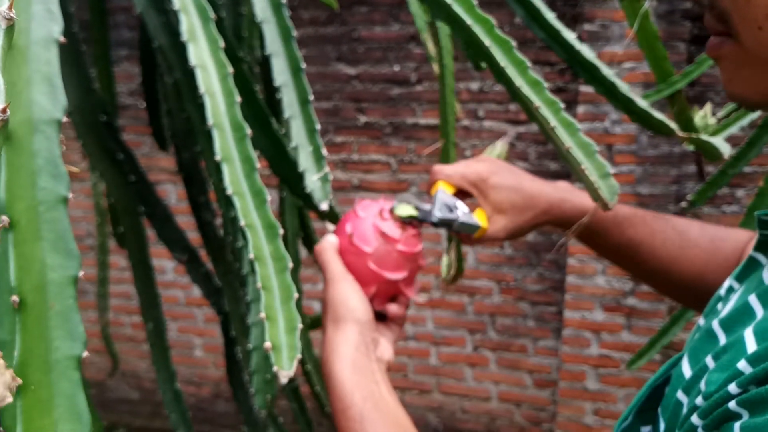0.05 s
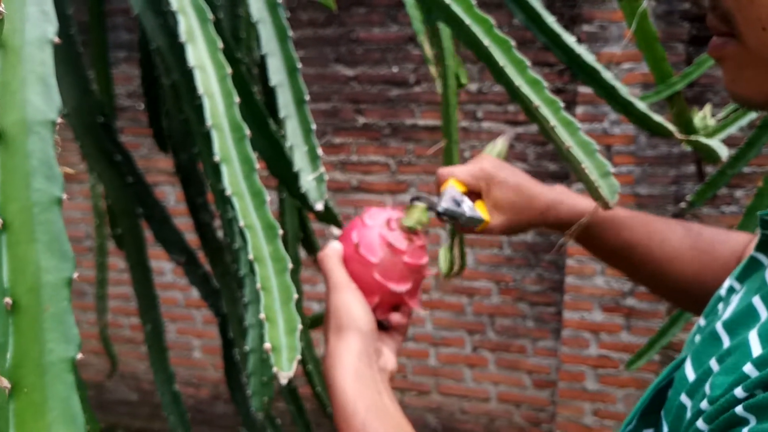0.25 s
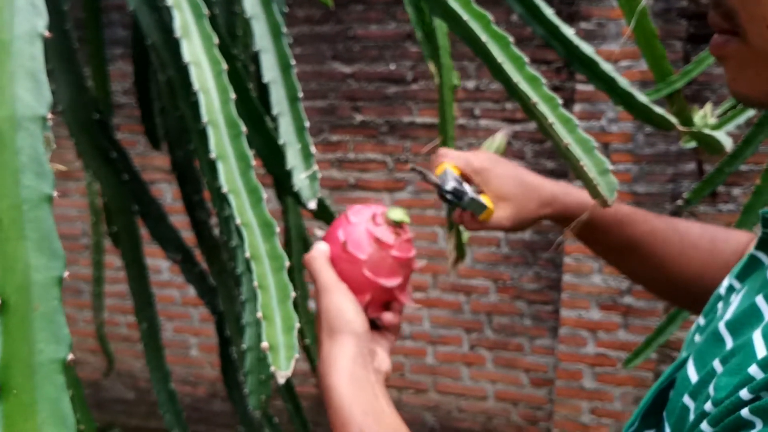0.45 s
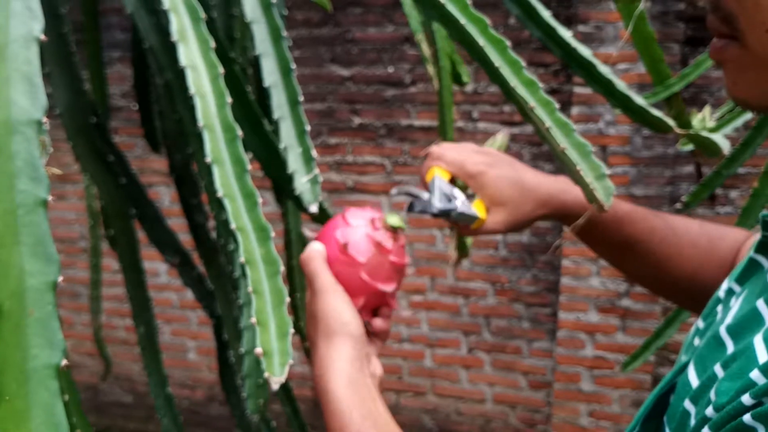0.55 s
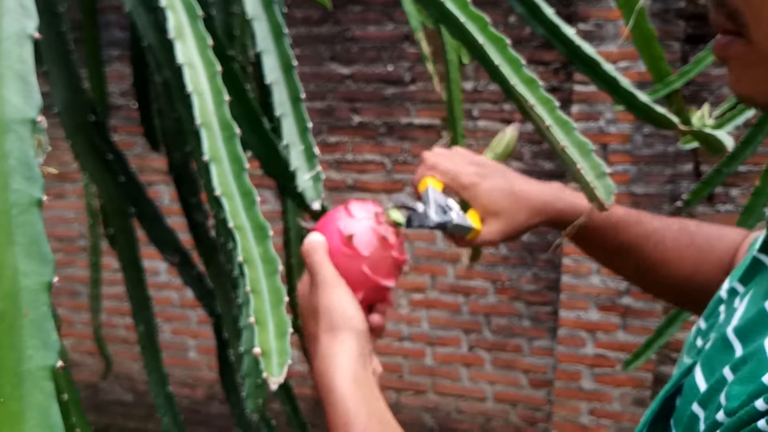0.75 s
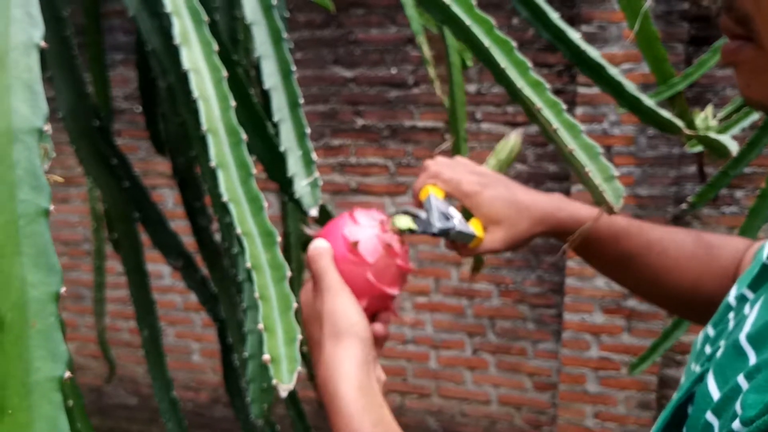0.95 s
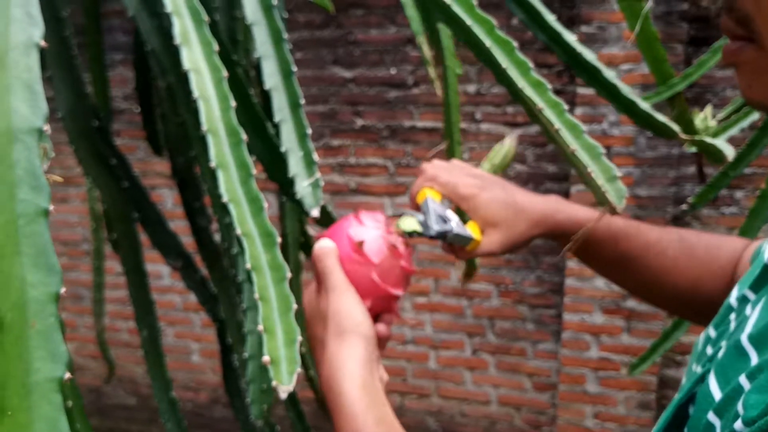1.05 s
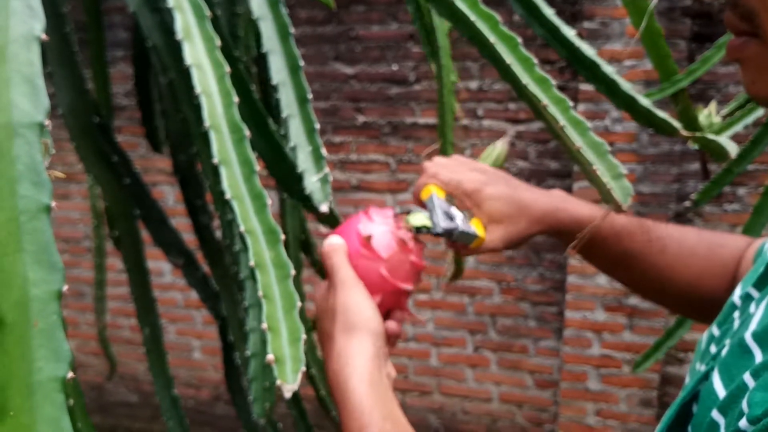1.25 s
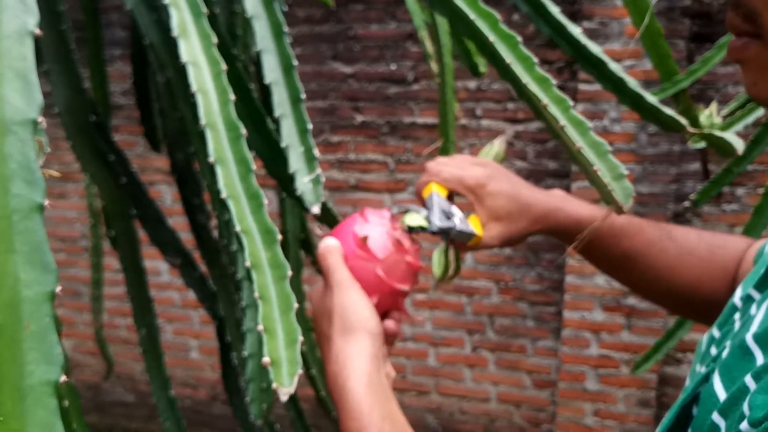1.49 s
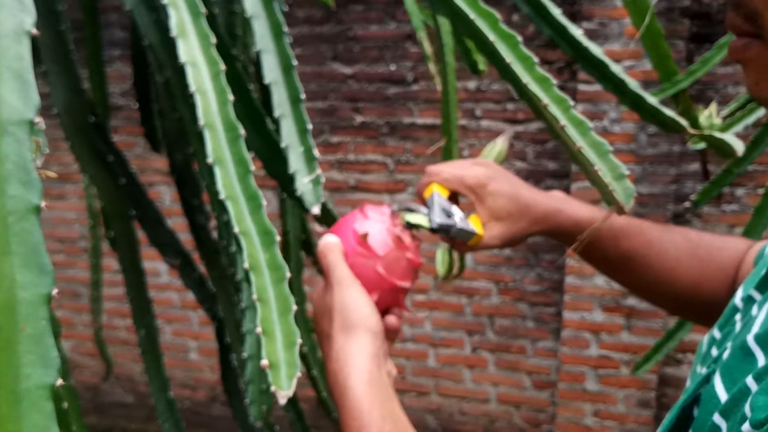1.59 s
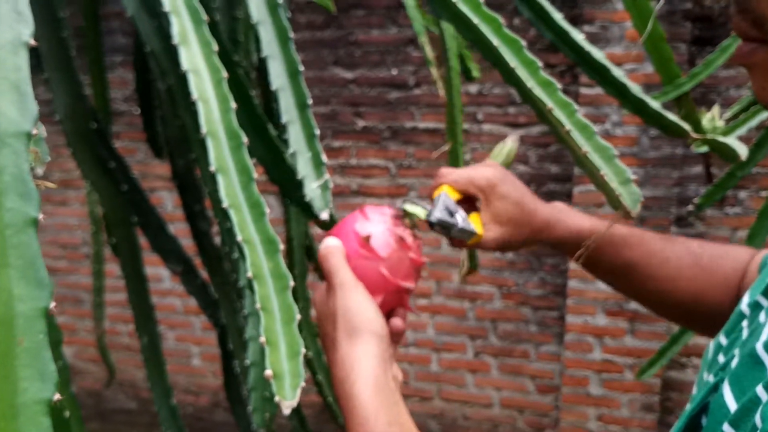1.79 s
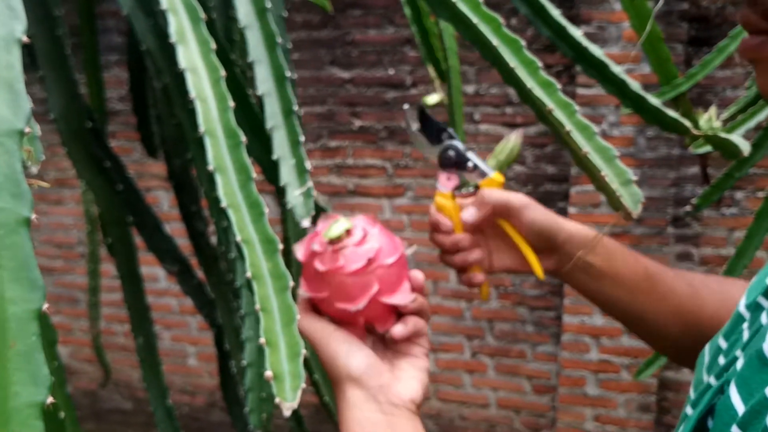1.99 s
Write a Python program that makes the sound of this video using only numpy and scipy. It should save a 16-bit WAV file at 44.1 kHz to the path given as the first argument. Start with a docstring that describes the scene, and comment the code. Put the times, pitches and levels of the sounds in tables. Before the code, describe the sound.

A single snip of hand shears right at the start, gritty crunch then sharp steel clack and brief squeak on opening, with short wall reflections; then quiet garden air, steady insect chorus, sparse far birds and a small late click.

```python
"""Pruning shears crunch through a fleshy stem and clack shut close by in a walled garden; the spring squeaks
as they open. A far insect chorus sings high, a few small birds whistle thinly, distant traffic rumbles.
Blows and noisy scrapes ring the modes of the shears; the spring is made of rising pings, the birds of gliding
narrow noise, insects and air of shaped stereo noise, with thin ticks and soft low bumps among them.
The walls answer shears, spring and ticks with a short decaying noise tail."""
import sys
import numpy as np
from scipy import signal
from scipy.fft import rfft, irfft, next_fast_len
from scipy.io import wavfile
from scipy.ndimage import uniform_filter1d, map_coordinates

SR = 44100
rng = np.random.default_rng(int(sys.argv[2]) if len(sys.argv) > 2 else 0)


def linear_from_db(decibels):
    """Turn decibels (scalar or array-like) into linear amplitude factors; 0 gives 1."""
    return 10 ** (np.asarray(decibels, float) / 20)


def bounce(signal):
    """Save signal as a 16-bit WAV file at the path given by the first command-line argument."""
    frames = np.transpose(np.atleast_2d(signal))
    limited = np.clip(frames, -1, 1)
    pcm = np.round(limited * 32767).astype(np.int16)
    wavfile.write(sys.argv[1], SR, pcm)


N = 88200


def unit(x):
    """Brought to rms 1."""
    return x / np.sqrt(np.mean(x ** 2) + 1e-20)


def along(points, hz):
    """Values between (Hz, value) points on a log frequency axis."""
    f, v = np.transpose(points)
    return np.interp(np.log(hz + 1), np.log(f + 1), v)


def level(rows):
    """Gain per sample from (seconds, dB) rows."""
    s, db = np.transpose(rows)
    return linear_from_db(np.interp(np.arange(N) / SR, s, db))


def wobble(rate):
    """A smooth random curve through rate knots a second."""
    knots = rng.standard_normal(int(N * rate / SR) + 4)
    return map_coordinates(knots, [np.arange(N) * rate / SR])


def sides(db):
    """Left and right gain for a left-right difference in dB."""
    return linear_from_db(np.array([[db / 2], [-db / 2]]))


def filtered(x, response):
    """x filtered by a complex response of frequency."""
    m = next_fast_len(x.shape[-1] + 8192)
    spectrum = rfft(x, m) * response(np.fft.rfftfreq(m, 1 / SR))
    return irfft(spectrum, m)[..., :x.shape[-1]]


def rush(gain, alike, patchy_db):
    """Stereo noise of rms 1, with smooth random patches of gain over time and frequency."""
    z = signal.stft(rng.standard_normal((2, N)), nperseg=512)[2]
    field = uniform_filter1d(rng.standard_normal(z.shape[1:]), size=5, axis=0)
    field = uniform_filter1d(field, size=9, axis=1)
    pair = signal.istft(z * linear_from_db(patchy_db * unit(field)), nperseg=512)[1][:, :N]

    def mid_side_gain(hz):
        # the balance of mid to side sets the left-right correlation
        turn = np.arccos(np.clip(along(alike, hz), -1, 1)) / 2
        return gain(hz) * np.array([np.cos(turn), np.sin(turn)])

    mid, side = filtered(pair, mid_side_gain)
    return unit(np.array([mid + side, mid - side]))


def add(track, s, sound):
    """Mix a stereo sound in at a time in seconds."""
    part = track[:, round(s * SR):][:, :sound.shape[1]]
    part += sound[:, :part.shape[1]]


def wall(sound):
    """The sound plus a fresh answer of the garden walls: noise that dies at a rate set by frequency."""
    # Each row: frequency in Hz, time to fall 60 dB in seconds.
    wall_decay = [(600, 0.4), (1500, 0.46), (3000, 0.31), (7000, 0.23), (12000, 0.15), (16000, 0.23)]
    wet_db, onset_s = -14.5, 0.00067
    hz, t, z = signal.stft(rng.standard_normal((2, SR // 3)), SR, nperseg=256)
    decay = linear_from_db(-60 * t / along(wall_decay, hz)[:, None])
    tail = signal.istft(z * decay, SR, nperseg=256)[1]
    tail = tail * (1 - np.exp(-np.arange(tail.shape[1]) / SR / onset_s))
    wet = linear_from_db(wet_db) * signal.fftconvolve(sound, tail / np.linalg.norm(tail[0]), axes=1)
    return wet + np.pad(sound, ((0, 0), (0, wet.shape[1] - sound.shape[1])))


def air():
    """Distant traffic rumble and the hiss of the open garden, as one bed of shaped noise."""
    # Tone of the bed. Each row: frequency in Hz, relative density in dB per Hz.
    air_tone = [(20, -20), (45, -12.5), (80, -0.5), (120, 2), (200, -3.5), (400, -7), (1000, -14.5),
                (2500, -19), (4500, -19.5), (7800, -24), (8600, -30), (13600, -36), (14800, -24.5),
                (15700, -22.5), (17000, -22)]
    # Stereo width of the bed. Each row: frequency in Hz, left-right correlation (0 to 1).
    likeness = [(50, 0.82), (150, 0.23), (400, 0.013), (10000, 0)]
    rms_db = -64
    return linear_from_db(rms_db) * rush(lambda hz: linear_from_db(along(air_tone, hz)), likeness, patchy_db=2.0)


def bumps():
    """Short swells of low pitch within the rumble: sines under a bell-shaped envelope."""
    # Soft low bumps. Each row: centre in seconds, level in dB, pitch in Hz, length in seconds.
    bump_rows = [(0.492, -53.5, 134, 0.026), (1.17, -61, 111.4, 0.069), (1.391, -62, 109, 0.011),
                 (1.568, -59.5, 109, 0.032)]
    out, t = np.zeros((2, N)), np.arange(N) / SR
    for s, db, hz, length in bump_rows:
        swell = np.exp(-(2 * (t - s) / length) ** 2)
        phase = rng.uniform(0, 0.73, (2, 1))  # radians, one per side
        out += linear_from_db(db) * swell * np.cos(2 * np.pi * hz * (t - s) + phase)
    return out


def insects():
    """Many far singers blur to a narrow, randomly fluttering band; a fainter, higher chorus swells behind."""
    # Main chorus over time. Each row: time in seconds, level in dB.
    chorus_level = [(0.45, -59.5), (0.69, -61), (1.338, -61.5), (1.49, -61), (2.0, -61)]
    # Fainter chorus over time. Each row: time in seconds, level in dB.
    far_level = [(0.45, -70.5), (0.614, -71), (0.86, -72.5), (1.248, -69.5), (1.504, -69), (1.766, -79),
                 (1.9, -89)]
    # Tone of the fainter chorus. Each row: frequency in Hz, relative density in dB per Hz.
    far_tone = [(5700, -41), (6100, 3.5), (6800, -0.5), (7900, -6.5), (8400, -41)]
    centre_hz, width_hz, flutter_db = 5451, 420, 1

    def chorus_band(hz):
        return 1 / (1 + (2 * (hz - centre_hz) / width_hz) ** 2) ** 1.34

    flutter = linear_from_db(flutter_db * wobble(62))
    near = level(chorus_level) * flutter * rush(chorus_band, [(5000, 0.043)], patchy_db=1.0)
    far = rush(lambda hz: linear_from_db(along(far_tone, hz)), [(5000, 0.1)], patchy_db=2.0)
    return near + level(far_level) * far


def birds():
    """Far whistles, smeared by distance into narrow gliding noise."""
    # Bird whistles. Each row: start in seconds, length in seconds, level in dB before breaks and fade,
    # first pitch in Hz, last pitch in Hz, smear in Hz, left-right difference in dB.
    whistle_rows = [(0.97, 0.16, -66, 6370, 6900, 247, -3), (1.298, 0.132, -63, 7010, 6880, 200, -5.5),
                    (1.683, 0.16, -59.5, 6210, 6470, 98, 0), (1.821, 0.15, -64, 6300, 6300, 130, -3),
                    (1.919, 0.108, -62, 7850, 7450, 250, 5), (1.954, 0.095, -54.5, 7230, 6930, 296, 3)]
    edge_s, breaks_db, fade_db_per_s = 0.035, 1.5, 20
    out, t = np.zeros((2, N)), np.arange(N) / SR
    for s, length, db, first_hz, last_hz, smear_hz, pan_db in whistle_rows:
        hz = np.interp(t, [s, s + length], [first_hz, last_hz])
        phase = 2 * np.pi * np.cumsum(hz) / SR
        # slow noise on a cosine and a sine carrier spreads the tone into a narrow band
        a, b = filtered(rng.standard_normal((2, 2, N)), lambda f: np.exp(-(f / smear_hz) ** 2))
        whistle = unit(a * np.cos(phase) + b * np.sin(phase))
        shape = np.clip(np.minimum(t - s, s + length - t) / edge_s, 0, 1)
        fade_db = fade_db_per_s * np.clip(t - s, 0, length)
        loudness = linear_from_db(db + breaks_db * wobble(24.46) - fade_db)
        out += loudness * sides(pan_db) * shape * whistle
    return out


def ticks():
    """Thin high ticks, likely an insect nearby: very short bursts of band-limited noise."""
    # High ticks. Each row: centre in seconds, level in dB.
    tick_rows = [(1.476, -68.5), (1.491, -66)]
    centre_hz, width_hz, length_s, pan_db = 9700, 1300, 0.00082, 13.5
    out, t = np.zeros((2, N)), np.arange(-200, 200) / SR
    for s, db in tick_rows:
        noise = rng.standard_normal((2, len(t)))
        hiss = filtered(noise, lambda f: np.exp(-((f - centre_hz) / width_hz) ** 2))
        burst = np.exp(-(t / length_s) ** 2) * unit(hiss)
        add(out, s + t[0], wall(linear_from_db(db) * sides(pan_db) * burst))
    return out


def spring():
    """Brief slips of the coil spring: soft-edged pings of rising pitch."""
    # Spring squeaks. Each row: centre in seconds, level in dB, pitch at the centre in Hz,
    # length in seconds, left-right difference in dB.
    squeak_rows = [(0.3915, -47, 5000, 0.002, 7), (0.3963, -40.5, 5330, 0.0023, 3),
                   (0.4018, -42, 5320, 0.00084, 20), (0.4034, -33, 5750, 0.002, -11),
                   (0.408, -53.5, 5610, 0.0073, 22)]
    rise_hz_per_s = 80000
    out, t = np.zeros((2, N)), np.arange(-400, 400) / SR
    for s, db, hz, length, pan_db in squeak_rows:
        phase = 2 * np.pi * (hz + rise_hz_per_s * t / 2) * t + rng.uniform(0, 1.0, (2, 1))
        ping = np.exp(-(2 * t / length) ** 2) * np.cos(phase)
        add(out, s + t[0], wall(linear_from_db(db) * sides(pan_db) * ping))
    return out


def shears():
    """Each contact is a blow, then a gritty scrape of noise, ringing the modes of the shears."""
    # Contacts of the blades. Each row: start in seconds, level in dB, gain of the low modes in dB,
    # gain of the top modes in dB, time for the scrape to fall 60 dB in seconds, left-right difference in dB.
    contact_rows = [(.0246, -49, -20, -16, 0.0068, -3), (.045, -52, -19, -35, .012, -8),
                    (0.066, -45, -9, -13, 0.0044, -12), (0.0692, -52, -10, -15, 0.0044, 11),
                    (0.0891, -40, 7, -0.5, 0.074, -3), (0.0901, -27, -5.5, 2, 0.0026, -0.5),
                    (.1268, -41, -3, 3, 0.028, -1.5), (0.1896, -45, -3, 2, 0.024, -3.5),
                    (0.1988, -50.5, 0.5, 1.5, 0.056, 4), (0.2055, -47.5, 8.5, -13, 0.021, -14),
                    (0.2119, -37, 2, -15, 0.011, -12.5), (.2156, -23, 5.5, 14, 0.025, 2.5),
                    (.2183, -27.5, -11, 13, 0.025, -11.5), (0.2194, -15.5, 1.5, 5.5, 0.0047, 3.5),
                    (.221, -25.5, 5.5, 9.5, 0.058, -2), (0.2267, -19, -17.5, 7, 0.017, -2.5),
                    (0.2276, -17.5, 0, -13, 0.0055, 4), (.2318, -30, -8.5, 0, 0.06, -6.5),
                    (0.3085, -43.5, 5, -16, 0.027, -3), (0.3906, -47.5, 5, -14, 0.13, -0.5),
                    (1.158, -62.5, 0.5, -12, 0.47, -2), (1.7226, -62.5, -3, 3, 0.041, 2),
                    (1.8489, -59.5, 7, -12, 0.016, -11.5), (1.8765, -49, -8, -14, 0.11, -4),
                    (1.8793, -41.5, -30, -3, 0.0023, 2.5)]
    # Modes of the shears. Each row: frequency in Hz, width in Hz, gain in dB,
    # left-right difference in dB, phase lead of the left in radians.
    mode_rows = [(826, 145, -6.5, -1, 1.58), (1525, 130, -6.5, 2, 0.63), (1850, 40, -14.5, -9, 0.7),
                 (2010, 173, -2.5, -4, 1.3), (2748, 295, -6.5, -5.5, 1.5), (3398, 320, -1, 6, 2),
                 (4240, 430, -14.5, -12.5, 2.84), (4940, 310, -4, 2, 1), (5520, 440, -1.5, 0, 1),
                 (6270, 420, -0.5, -8, -0.25), (6746, 340, -1.5, 6.5, 1.8), (7450, 490, 1.5, 1, 4),
                 (8230, 820, -5.5, 9.5, 4), (10300, 800, -22.5, 18, 2.5), (12000, 1360, -22, 7.5, 2),
                 (15150, 630, -15.5, 11, -2.5)]
    # Modes between handle and pivot pitch sink while the pivot is slack.
    # Each row: time in seconds, share of their full pitch (a ratio).
    tightness = [(.1, 0.888), (.2, 0.95), (.25, 0.993), (.31, 0.924), (.38, 0.96)]
    handle_hz, pivot_hz, low_hz, top_hz = 1000, 2300, 4300, 9300
    rise_s, shared, grit_db, grit_per_s, blow_db, thin_hz = 0.00067, 0.66, 4, 934, 17.5, 720
    out, t = np.zeros((2, N)), np.arange(4096) / SR
    for s, db, low_db, top_db, t60, pan_db in contact_rows:
        both, left, right, knots = rng.standard_normal((4, len(t)))
        # grit: random level steps joined by lines, starting after the rise
        grit_at = np.maximum(t - 2 * rise_s, 0) * grit_per_s
        grit = linear_from_db(grit_db * np.interp(grit_at, np.arange(len(t)), knots * (t > 0)))
        shape = grit * linear_from_db(-60 * t / t60) * (1 - np.exp(-t / rise_s))
        scrape = (shared * both + np.sqrt(1 - shared ** 2) * np.array([left, right])) * shape
        scrape[:, 0] = linear_from_db(blow_db)  # the blow is a single-sample click
        tight = np.interp(s, *np.transpose(tightness))

        def modes(f):
            total = 0
            for k, (hz, width, gain_db, lr_db, lead) in enumerate(mode_rows):
                pitch = hz * tight if handle_hz < hz < pivot_hz else hz
                gain = linear_from_db(gain_db + low_db * (hz < low_hz) + top_db * (hz > top_hz))
                turn = np.exp([[0.5j * lead], [-0.5j * lead]])
                resonance = 1j * f * width / (pitch ** 2 - f * f + 1j * f * width)
                total = total + (-1) ** k * gain * sides(lr_db) * turn * resonance
            thin = (1j * f / (thin_hz + 1j * f)) ** 3  # third-order bass cut
            return thin * total

        ring = filtered(scrape, modes)
        # level follows the energy over the scrape's length, so long scrapes are not quieter
        strength = np.linalg.norm(ring) / np.sqrt(t60 * SR / 8 + 30)
        add(out, s, wall(linear_from_db(db) * sides(pan_db) * ring / strength))
    return out


def scene():
    """All sources together, from the background to the shears."""
    return air() + bumps() + insects() + birds() + ticks() + spring() + shears()


def roll_off(x):
    """The treble ends steeply here."""
    return signal.sosfilt(signal.butter(12, 16810, fs=SR, output="sos"), x)


def record(dry):
    """The microphone rolls off steeply at the top."""
    top_hz = 15560
    mix = filtered(dry, lambda hz: 1 / (1 + (hz / top_hz) ** 60))
    return roll_off(mix)


dry = scene()
out = record(dry)
bounce(out)
```